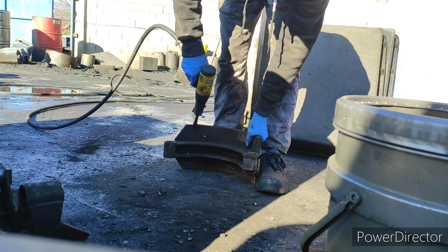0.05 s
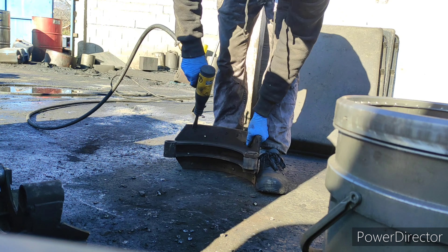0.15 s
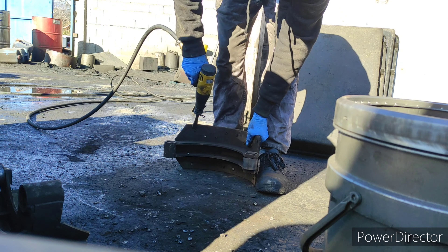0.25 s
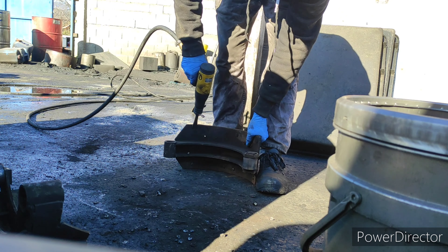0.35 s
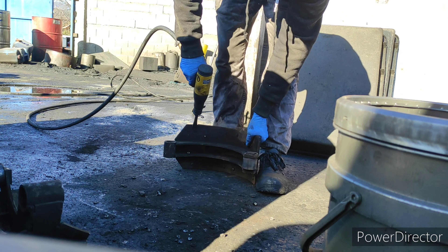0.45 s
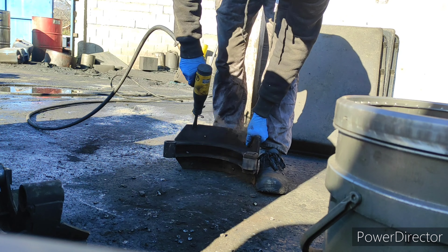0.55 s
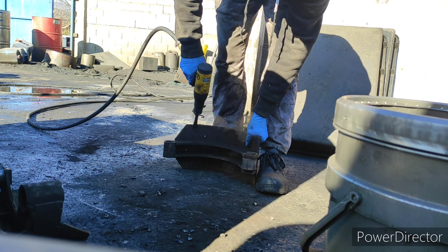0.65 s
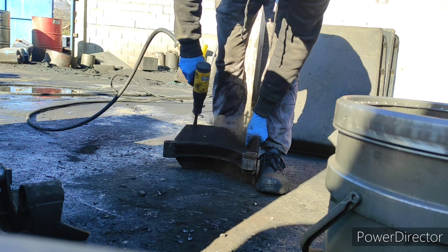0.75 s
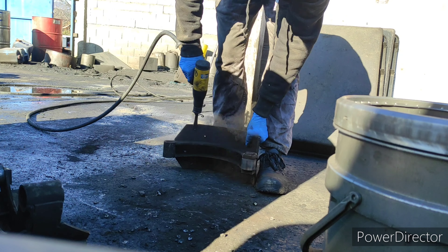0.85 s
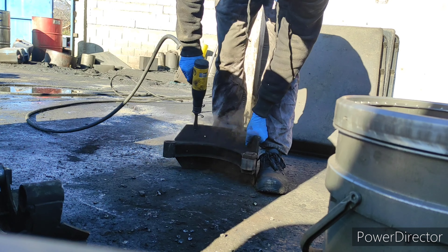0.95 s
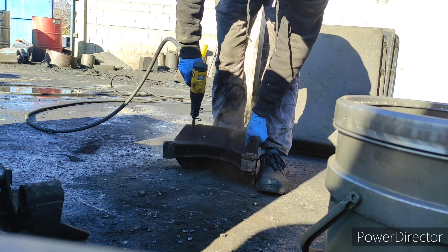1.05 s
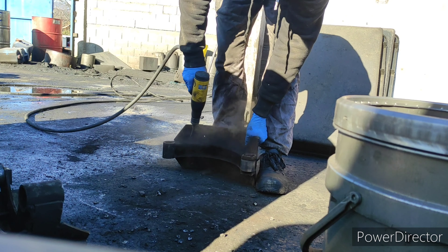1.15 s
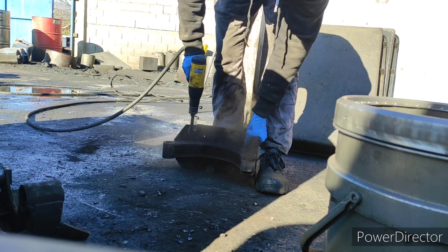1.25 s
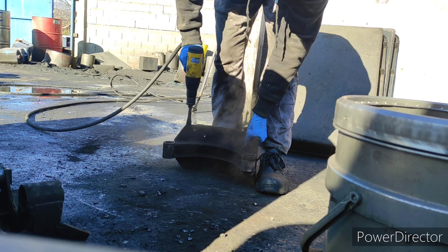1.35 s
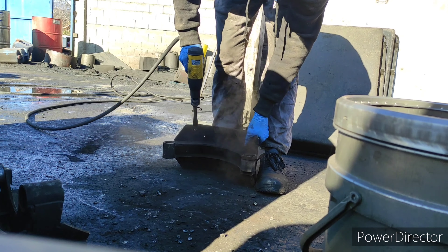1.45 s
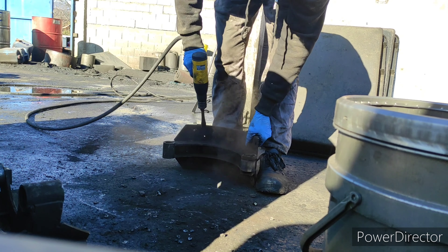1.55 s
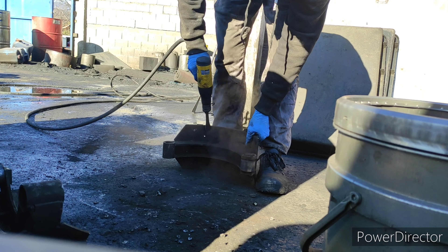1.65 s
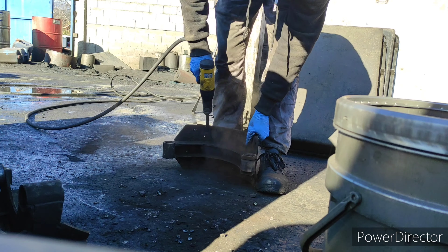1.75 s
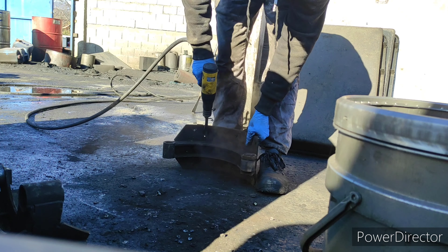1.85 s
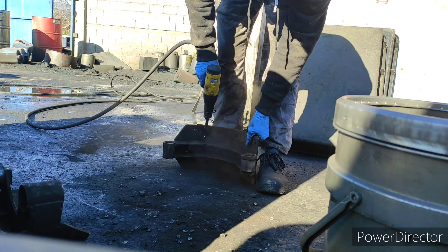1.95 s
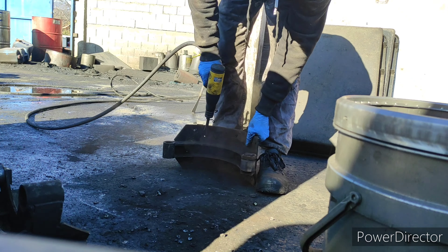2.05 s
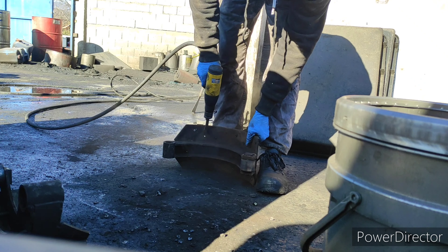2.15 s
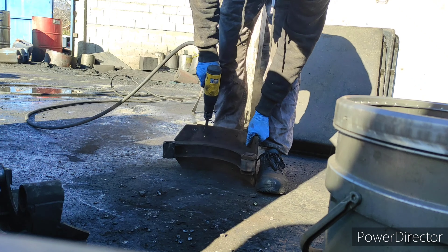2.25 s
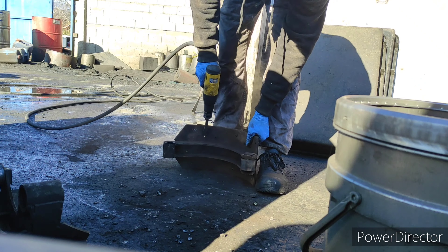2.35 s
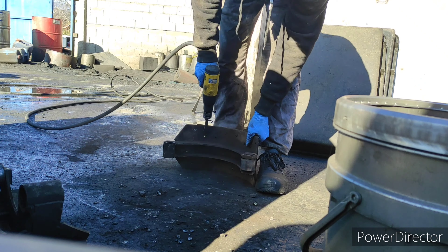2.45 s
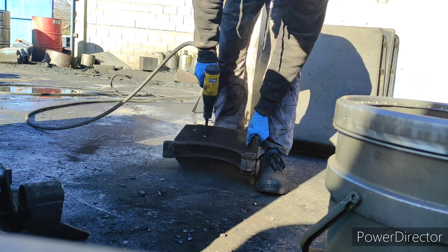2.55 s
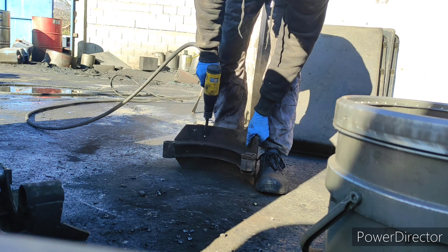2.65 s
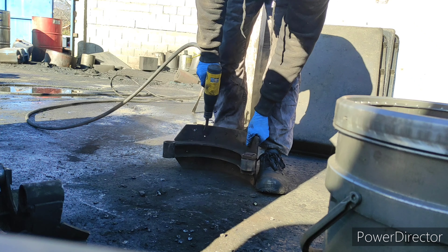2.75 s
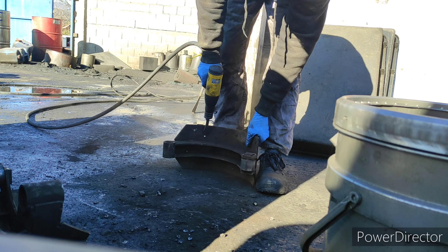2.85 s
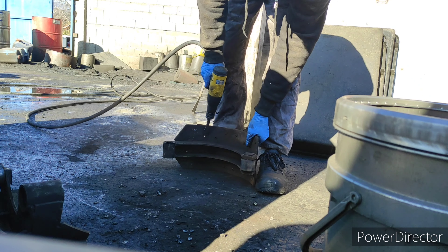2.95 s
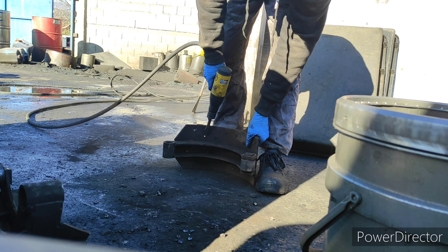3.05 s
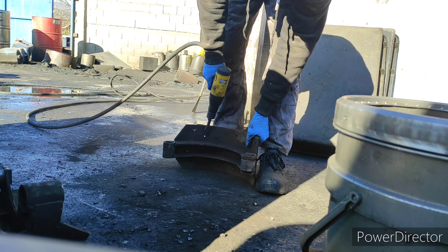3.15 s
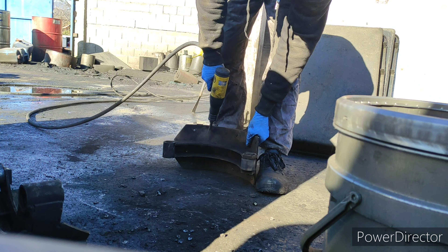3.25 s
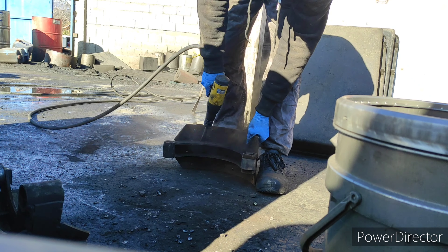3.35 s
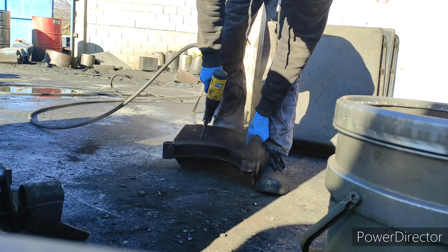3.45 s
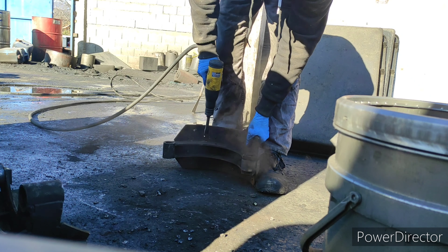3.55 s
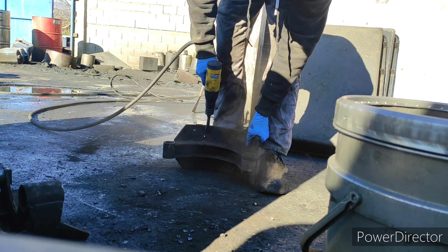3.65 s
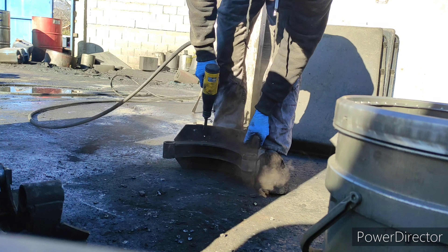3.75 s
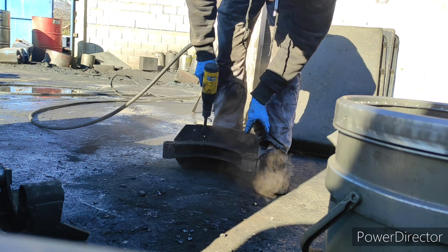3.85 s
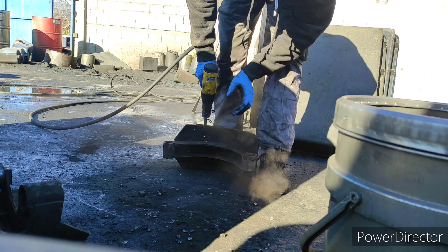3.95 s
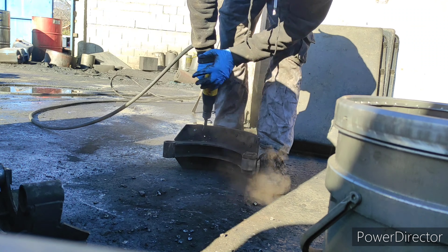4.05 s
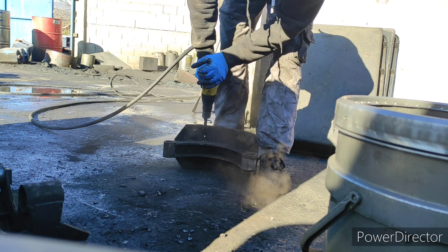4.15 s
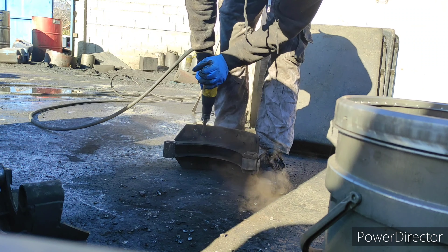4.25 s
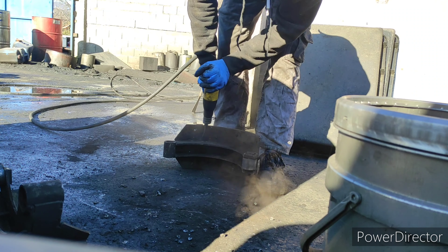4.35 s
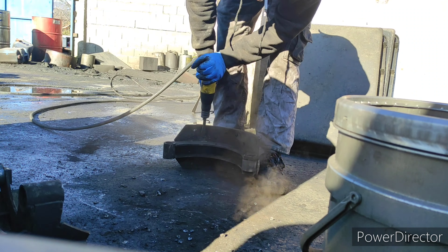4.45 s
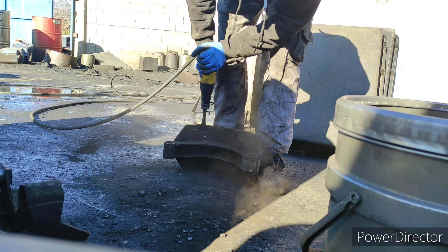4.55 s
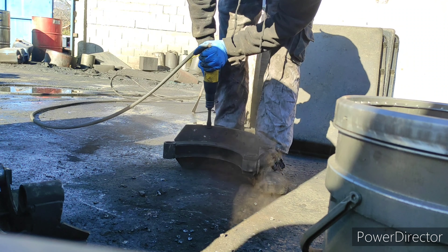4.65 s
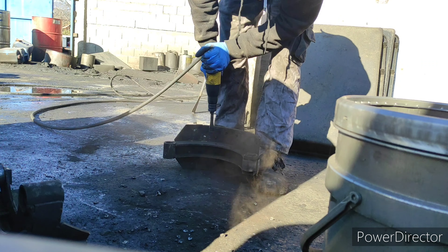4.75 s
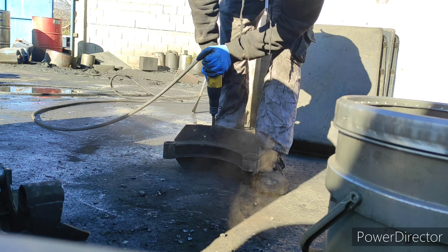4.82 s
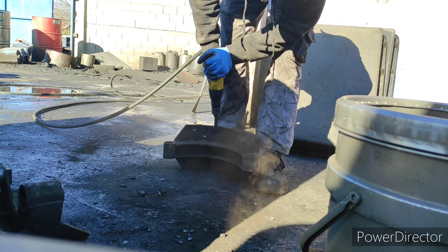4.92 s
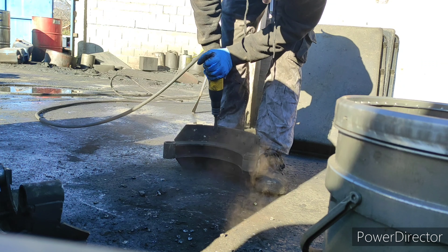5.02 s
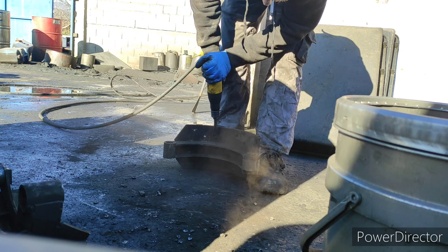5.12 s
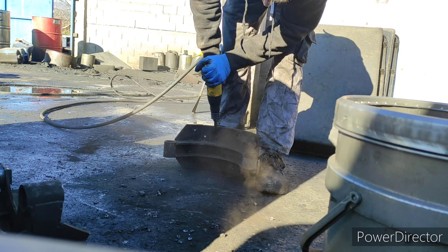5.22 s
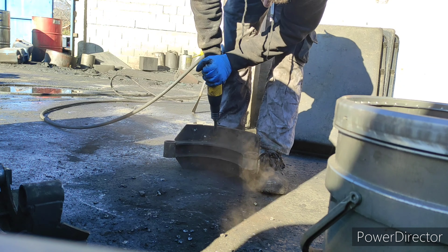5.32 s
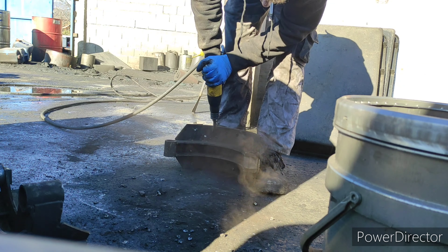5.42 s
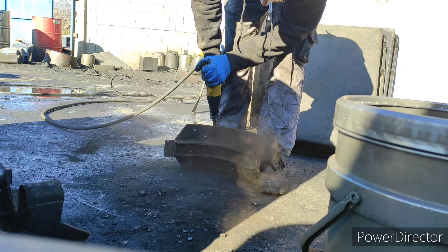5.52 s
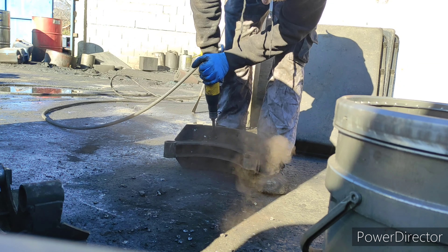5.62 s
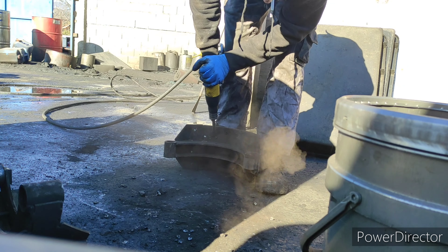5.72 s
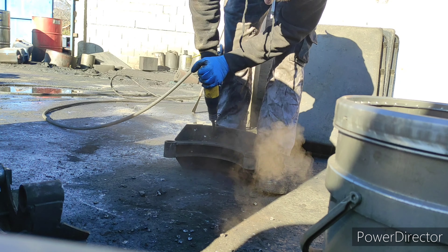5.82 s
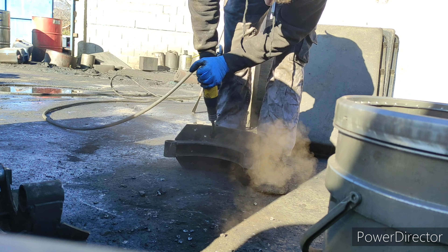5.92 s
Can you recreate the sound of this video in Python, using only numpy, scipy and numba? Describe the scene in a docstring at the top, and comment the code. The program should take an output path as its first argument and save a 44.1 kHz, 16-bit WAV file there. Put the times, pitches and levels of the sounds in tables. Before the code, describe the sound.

An air hammer pounds a heavy steel part in four bursts, the first nearly a second long, the next two very brief, the last over half a second. Each is a dense metallic rattle with puffing exhaust and bright hiss. Between them come steel snaps, small ticks and thuds, and leaking air. Near stereo microphone in a walled yard, thin echo, faint engine drone, background ducked after loud blows.

```python
"""An air chisel hammers the lining off a steel brake shoe in four bursts, in a walled yard.
Each piston stroke vents a puff of exhaust (pressure wavelets), clangs the shoe (filtered noise and decaying
modes) and rattles the chisel under a hiss of air; between bursts, noise knocks and ringing modes make contacts.
An engine idles far off as a few wavering sines, walls add a noise tail, and a peak limiter ducks the loudest
blows and recovers slowly."""
import sys
import numpy as np
from scipy import signal
from scipy.fft import rfft, irfft
from scipy.io import wavfile
from scipy.ndimage import uniform_filter1d, minimum_filter1d
from numba import njit

SR = 44100
rng = np.random.default_rng(int(sys.argv[2]) if len(sys.argv) > 2 else 0)


def output_pcm(signal):
    """Save a mono or channel-first signal as 16-bit PCM at the path in sys.argv[1].

    Samples are clipped to [-1, 1] before scaling.
    """
    pcm = np.clip(np.atleast_2d(signal).T, -1, 1) * 32767
    wavfile.write(sys.argv[1], SR, np.round(pcm).astype(np.int16))


N = 263718

# Levels in the tables are relative: the functions add trims or normalise.
# Piston speed, one curve per trigger pull. Each row: time in seconds, strokes per second.
STROKE_RATE = [
    [(.4372, 42.5), (.4778, 34.8), (.5978, 41.3), (.7978, 44.9), (1.1178, 46.7), (1.1778, 43.6),
     (1.2378, 36), (1.2598, 56.2), (1.2956, 39.2)],
    [(3.3294, 53.3), (3.4078, 42), (3.4878, 52.2), (3.5647, 45.2)],
    [(4.3111, 52), (4.3428, 46.1), (4.4278, 44.8), (4.5128, 57.2), (4.5723, 23.5)],
    [(5.4232, 37.7), (5.4578, 49.8), (5.6478, 49.9), (5.7378, 31.1), (5.8628, 29.1), (5.8978, 38.2),
     (5.98, 38.2)],
]
# Trigger pulls. Each row: valve opens in seconds, chisel bites in seconds, exhaust puff in dB,
# blow on the shoe in dB, air and rattle in dB, ring of the shoe relative to the blow in dB.
PULLS = [(0.4195, .46, -24.5, -17.5, -19, 3.5), (3.3137, 3.345, -25, -20, -20, -5),
         (4.2919, 4.328, -22.5, -19, -18.5, 1), (5.3864, 5.462, -23, -17.5, -17.5, -1)]
# The loose chisel snaps against steel. Each row: start in seconds, crack in dB, ring of the free chisel in dB.
SNAPS = [(.4455, 5, -8), (1.33, -2.5, -11.5), (1.337, 3, -26.5), (1.8154, -5.5, -48), (1.8353, -2.5, -51),
         (3.566, -14.5, -12), (3.597, -0.5, -32), (3.6055, -5.5, -6), (3.791, 3, -42), (3.8113, 1, -42),
         (3.9603, -12.5, -57), (4.5685, -25.5, -6.5), (4.6128, 1, -14), (4.623, -9, -6), (4.668, -1.5, -4),
         (4.676, -5, -8.5), (4.7401, -11, -29), (5.0724, -6, -43), (5.0789, 1, -42), (5.411, -1.5, -15)]
# Light, dull knocks as tool and shoe are shifted. Each row: start in seconds, tick in dB, thud in dB.
KNOCKS = [(1.782, -37.5, -46), (2.0457, -25.5, -37.5), (2.204, -41, -50), (2.224, -30.5, -28.5),
          (2.233, -32, -32), (2.424, -60, -42), (2.9914, -40.5, -57), (3.028, -46, -55), (3.0666, -41, -51),
          (3.112, -45, -62), (3.922, -41, -37), (4.052, -40, -32.5), (4.124, -29, -27), (4.133, -31, -42),
          (4.2, -43.5, -56), (5.276, -32, -56), (5.3266, -40, -29.5)]
# Blows as the pressure comes off. Each row: start in seconds, low modes in dB, high modes in dB.
EASED_BLOWS = [(1.2575, -32, -12), (1.2802, -30, -11), (1.288, -8, -30), (1.33066, -13.5, -15),
               (3.5638, -22, -30), (3.5999, -26, -34), (4.522, -24, -12), (4.548, -18, -28)]
# Last slow strokes, hollow in the barrel. Each row: start in seconds, level in dB.
IDLE_STROKES = [(4.609, -18), (4.662, -16), (4.7229, -18)]
# Air leaks at the trigger valve. Each row: start in seconds, shut in seconds, level in dB.
LEAKS = [(1.213, 1.25, -14.5), (3.546, 3.606, -33), (4.595, 4.69, -37), (4.69, 5.293, -47),
         (4.852, 4.926, -48.5)]

# Modes of the shoe pressed down by the chisel. Each row: frequency in Hz, level in dB, t60 in seconds.
SHOE_HELD = [(970, -4.5, .07), (1218, -3.5, .27), (1280, -4, .1), (1299, -1, .14), (1647, -10, .07),
             (1759, 0.5, .125), (1782, -3, .08), (1846, -3, .07), (1972, -3, .08), (2015, -4, .07),
             (2248, -6, .07), (2347, -8, .07), (2523, -9, .06), (2815, -10, .07), (3235, -5, .06),
             (3713, -17, .1), (4040, -13, .12), (5160, -18, .1), (5545, -17, .1)]
# Modes of the shoe once the pressure is off. Each row: frequency in Hz, level in dB, t60 in seconds.
SHOE_FREE = [(328, -24, .3), (484, -28, .5), (743, -28, .4), (1219, 0, .19), (1220, -16, .52),
             (1290, -15, .22), (1762, 0, .12), (1795, -5, .09), (1975, -12, .07), (2815, -19, .15)]
# Modes of the free chisel. Each row: frequency in Hz, level in dB, t60 in seconds.
CHISEL = [(7364, -17, .15), (7585, 0, .15), (7640, -11, .08), (7709, -10, .12), (8520, -13, .06),
          (9448, -18, .22), (11280, -28, .26), (13540, -23, .22), (13600, -28, .14)]
# Modes of the tool's barrel. Each row: frequency in Hz, level in dB, t60 in seconds.
BARREL = [(221, -5, .08), (450, -4, .05), (570, -4, .05), (690, -3, .07), (735, -3, .09), (800, -4, .07),
          (1020, -7, .06), (1300, -7, .08), (1650, -11, .04)]
# Boom of shoe, ground and barrel at a stroke. Each row: frequency in Hz, level in dB, t60 in seconds.
BOOM = [(165, -13, .06), (200, -6, .06), (226, 3, .08), (295, -1.5, .06), (400, -8, .06), (506, -9, .07),
        (610, -9, .05), (740, -2, .08), (850, -5, .08), (982, -7, .09)]
# Brief clack of steel on steel. Each row: frequency in Hz, level in dB, t60 in seconds.
CLACK = [(1830, -3, .06), (1915, -5, .05), (2010, -4, .07), (2230, -7, .05), (2480, -9, .04),
         (3800, -8, .04), (6350, 0, .06), (6950, -2, .05), (8350, 0, .05)]
# Tones of the far engine. Each row: frequency in Hz, rms level in dB.
IDLE = [(48.4, -49.5), (77.7, -46), (114, -72.5), (143, -60.5), (157, -47), (171.6, -53.5), (200, -60),
        (230, -75.5)]

# Noise spectrum of exhaust reflections and thuds. Each row: frequency in Hz, density in dB per Hz.
PUFF_TAIL = [(110, -38), (170, -28), (220, 8), (380, 1.5), (600, -9.5), (900, -20), (1300, -48.5)]
# Noise spectrum of the shoe's dense modes. Each row: frequency in Hz, density in dB per Hz.
CLANG = [(150, -12), (400, 4), (650, 3.5), (900, 0.5), (1300, -2), (1520, -3.5), (1900, -1), (2500, -4),
         (3250, -2), (3550, -24), (5000, -14.5), (7000, -64)]
# Noise spectrum of air and chisel rattle. Each row: frequency in Hz, density in dB per Hz.
AIR = [(200, -21), (1500, -14.5), (3500, -14), (5000, -16), (6200, -10.5), (7000, -5), (7600, -2.5),
       (8600, -3.5), (9400, -10), (10200, -20), (13000, -19.5), (15300, -22.5)]
# Noise spectrum of a steel snap. Each row: frequency in Hz, density in dB per Hz.
SNAP = [(300, -12.5), (1000, -46), (1500, -11.5), (1820, -3.5), (2600, -13), (3800, -8), (5200, -13),
        (6300, -1.5), (8400, 5.5), (9600, -13), (11500, -24), (15000, -45)]
# Noise spectrum of a light tick. Each row: frequency in Hz, density in dB per Hz.
KNOCK = [(600, -0.5), (1300, 4.5), (2200, 1), (3500, -7), (5000, -10.5), (7200, 0.5), (9000, -8),
         (10200, -54), (15000, -36.5)]
# Noise spectrum of the leaking valve. Each row: frequency in Hz, density in dB per Hz.
LEAK_HISS = [(1200, -14.5), (3500, -15), (5500, -13), (7100, -0.5), (8600, -3.5), (9500, -19.5),
             (10300, -25), (15000, -43)]
# Noise spectrum of the distant outdoors. Each row: frequency in Hz, density in dB per Hz.
YARD = [(20, -8), (50, 3.5), (90, -2.5), (125, -9.5), (180, -0.5), (250, -15.5), (500, -14), (1000, -20),
        (1300, -23), (2000, -27.5), (4000, -38.5), (7200, -33), (9000, -36), (10300, -56), (15000, -58.5)]
# Noise spectrum of the jet's buffeting. Each row: frequency in Hz, density in dB per Hz.
DRAUGHT = [(3, 7), (10, -11.5), (20, -1.5), (40, -11.5), (90, -17.5), (160, -20.5), (400, -67.0)]
# Noise spectrum of the wall echo. Each row: frequency in Hz, density in dB per Hz.
ECHO = [(100, 16.0), (500, 10.0), (1250, 9.5), (1750, -1.5), (4000, 2.0), (8000, -1.0), (12000, 4.5)]
# Noise spectrum of the piston's hollow thud. Each row: frequency in Hz, density in dB per Hz.
HOLLOW_THUD = [(120, -12), (220, 4), (750, 0), (1400, -4), (2500, -28)]

# Resonances of the two microphone ports. Each row: frequency in Hz, left minus right in dB.
PORTS = [(60, 4.5), (250, 4.5), (600, 1), (1300, 2), (2400, 0.5), (5500, -2), (6300, 0), (7200, -12),
         (7900, 6), (8500, 1.5), (9300, 4), (10200, 0.5)]
# Likeness of left and right in all noise. Each row: frequency in Hz, correlation.
LIKENESS = [(50, 0.7), (280, 0.95), (640, 0.21), (1400, 0), (3000, 0.028), (7000, 0.25), (15000, 0)]

USUAL_RATE = 45  # strokes per second at which the pace is zero octaves
AIR_DB_PER_OCTAVE = 1.5  # air and rattle grow with piston speed


def undb(db):
    """Level to amplitude ratio: 20 dB is a factor of ten."""
    return 10 ** (np.asarray(db) / 20)


def clock():
    """Sampling: the time in seconds of every sample."""
    return np.arange(N) / SR


def on_bins(points):
    """Logarithmic frequency interpolation of a table at every Fourier bin."""
    hz, value = np.transpose(points)
    bin_hz = np.maximum(np.arange(N // 2 + 1) * SR / N, 1)
    return np.interp(np.log(bin_hz), np.log(hz), value)


def noise(spectrum):
    """Spectral shaping: stereo noise of rms 1; mid and side weights set the channel correlation."""
    mid, side = rfft(rng.standard_normal((2, N)))
    alike = np.clip(on_bins(LIKENESS), -1, 1)
    mid = mid * np.sqrt(1 + alike)
    side = side * np.sqrt(1 - alike)
    x = irfft(np.array([mid + side, mid - side]) * undb(on_bins(spectrum)), N)
    return x / x.std()


def walk(rate):
    """Low-pass random fluctuation: twice-smoothed random steps with a standard deviation of 1."""
    k = int(SR / rate)
    steps = np.repeat(rng.standard_normal(N // k + 1), k)
    x = uniform_filter1d(uniform_filter1d(steps, k), k)[:N]
    return x / x.std()


def fade(t60):
    """Exponential decay: amplitude falls by 60 dB in t60 seconds."""
    return np.exp(-np.log(1000) * clock() / t60)


def gate(start, end, attack_s, release_t60_s):
    """Valve envelope: linear rise, hold until the end, exponential release."""
    t = clock()
    rise = np.clip((t - start) / attack_s, 0, 1)
    return rise * np.exp(-np.log(1000) * np.maximum(t - end, 0) / release_t60_s)


def unit(x):
    """Energy normalisation: a response of energy 1, averaged over the channels."""
    return x / np.sqrt(np.mean(np.sum(x ** 2, axis=-1)))


def scatter(size, spread_db=.8):
    """Random variation: no two strokes are quite alike in level."""
    return size * undb(spread_db * rng.standard_normal(len(size)))


def strike(times, sizes, response):
    """Convolution: each impulse starts the first second of the same response."""
    pulses = np.zeros(N)
    samples = np.clip((np.asarray(times) * SR).astype(int), 0, N - 1)
    np.add.at(pulses, samples, sizes)
    return signal.fftconvolve(pulses[None], np.atleast_2d(response)[:, :SR], axes=1)[:, :N]


def crash(times, sizes, spectrum, shape):
    """High modal density: countless close modes act as noise whose blow energies add."""
    envelope = np.sqrt(np.abs(strike(times, np.square(sizes), shape ** 2)))
    softened = uniform_filter1d(uniform_filter1d(envelope, size=15), size=15)
    return noise(spectrum) * softened


def ring(modes, spread=.55, contact_s=.0002):
    """Modal superposition: decaying sines after a soft contact, with a separate phase at each port."""
    t = np.arange(SR) / SR
    total = 0
    for hz, db, t60 in modes:
        phase = spread * rng.standard_normal((2, 1))
        total = total + undb(db) * np.exp(-np.log(1000) * t / t60) * np.sin(2 * np.pi * hz * t + phase)
    push = 1 - np.exp(-(t / contact_s) ** 2)
    return push * total


def background(noise_db=-45.5, engine_db=-1, waver_db=1.5, drift_rad=0.27):
    """Distant sources: slowly swelling outdoor noise and wavering engine tones, a little to the left."""
    engine = 0
    for hz, db in IDLE:
        level = np.sqrt(2) * undb(db + waver_db * walk(7.4))  # sqrt(2) turns rms into peak
        phase = drift_rad * walk(1.1) + rng.uniform(0, 2 * np.pi)
        engine = engine + level * np.sin(2 * np.pi * hz * clock() + phase)
    pan_db = np.array([[1.3], [-1.3]])
    swell_db = .6 * walk(1.5)
    return undb(engine_db + pan_db) * engine + noise(YARD) * undb(noise_db + swell_db)


def yard_echo(x, db=-19, t60_s=0.73, gap_s=.012):
    """Diffuse reflection: walls and scrap return a thin decaying tail, weaker above the low range."""
    tail = noise(ECHO) * fade(t60_s) * (clock() > gap_s)
    return undb(db) * signal.fftconvolve(x, unit(tail[:, :SR]), axes=1)[:, :N]


def draught(flow, db=-1, delay_s=0.0071):
    """Turbulent pressure: the exhaust jet reaches the microphone a little later and buffets it."""
    late_flow = np.interp(clock() - delay_s, clock(), flow)
    return undb(db) * noise(DRAUGHT) * late_flow


def leak(flutter_db=1.5, attack_s=0.0034, release_t60_s=0.43):
    """Turbulent flow through a narrow gap: a thin hiss while the trigger is nearly shut."""
    opening = sum(undb(db) * gate(start, end, attack_s, release_t60_s) for start, end, db in LEAKS)
    return noise(LEAK_HISS) * opening * undb(flutter_db * walk(39))


def run_down(thud_db=-13):
    """Cavity resonance: with the trigger nearly shut the piston falls back with dull, hollow thuds."""
    s, stroke_db = np.transpose(IDLE_STROKES)
    thud = crash(s, undb(stroke_db + thud_db), HOLLOW_THUD, fade(.16))
    return strike(s, undb(stroke_db), ring(BARREL, contact_s=0.00058)) + thud


def knocks(tick_db=-1, thud_db=-4):
    """Light impact: a tick of steel and a thud of the shoe on the ground, both short noise."""
    s, db, thud = np.transpose(KNOCKS)
    tick_decay = fade(.016) + .25 * fade(.1)
    ticks = crash(s, undb(db + tick_db), KNOCK, tick_decay)
    return ticks + crash(s, undb(thud + thud_db), PUFF_TAIL, fade(.09))


def snaps(crack_db=-4, chisel_db=-3, clack_db=-24, crack_t60_s=0.0064, rattle_db=-18, rattle_t60_s=0.1):
    """Hard impact, also as each pull throws the chisel forward: crack, clack, rattle and free ringing."""
    throw_db, throw_ring_db = -10, -15
    throws = [(pull[0], throw_db, throw_ring_db) for pull in PULLS]
    s, db, free_chisel = np.transpose(list(SNAPS) + throws)
    decay = fade(crack_t60_s) + undb(rattle_db) * fade(rattle_t60_s)
    crack = crash(s, undb(db + crack_db), SNAP, decay)
    clack = strike(s, undb(db + clack_db), ring(CLACK))
    return crack + clack + strike(s, undb(free_chisel + chisel_db), ring(CHISEL))


def inrush(db=-13.5, t60_s=0.12):
    """Sudden expansion: a spit of air just before the first stroke of each pull."""
    opens = [pull[0] for pull in PULLS]
    return crash(opens, np.full(len(opens), undb(db)), AIR, fade(t60_s))


def eased_shoe():
    """Reduced damping: as pressure comes off, blows ring low or high modes according to where they land."""
    s, low_db, high_db = np.transpose(EASED_BLOWS)
    split_hz, phase_spread = 1500, .26
    low = ring([mode for mode in SHOE_FREE if mode[0] < split_hz], phase_spread)
    high = ring([mode for mode in SHOE_FREE if mode[0] >= split_hz], phase_spread)
    return strike(s, undb(low_db), low) + strike(s, undb(high_db), high)


def octaves(speed, t):
    """Logarithmic pace: octaves of piston speed above the usual rate at the times t."""
    return np.log2(np.interp(t, *np.transpose(speed)) / USUAL_RATE)


def airflow(attack_s=0.044, release_t60_s=0.26):
    """Flow control: air comes on with the trigger, follows the piston and dies after the last stroke."""
    flow = 0
    for speed, (opens, _, _, _, air_db, _) in zip(STROKE_RATE, PULLS):
        level = undb(air_db + AIR_DB_PER_OCTAVE * octaves(speed, clock()))
        flow = flow + level * gate(opens, speed[-1][0], attack_s, release_t60_s)
    return flow


def chatter(flow, db=2, spread_db=3, t60_s=0.016, per_s=220):
    """Random impacts: the chisel's shank clatters in its holder while the air flows."""
    count = int(per_s * N / SR)
    s = rng.uniform(0, N / SR, count)
    sizes = undb(spread_db * np.minimum(rng.exponential(size=count), 3))
    return undb(db) * flow * crash(s, sizes, AIR, fade(t60_s))


def air(times, size, flow, rattle_db=30, steel_db=17.0, flutter_db=2):
    """Damped impact and jet noise: the loaded chisel jangles on stroke and return over spurts and hiss."""
    lag_s, return_s, return_jitter_s = .001, .0088, .0006
    return_db, spurt_db, hiss_db = -1.5, -27, -3.5
    returns = times + return_s + return_jitter_s * rng.standard_normal(len(times))
    hits = np.r_[times + lag_s, returns]
    size = scatter(np.r_[size, size * undb(return_db)], spread_db=1.5)
    decay = (fade(.025) + .8 * fade(.13)) * (1 - np.exp(-clock() / .0004))
    jangle = strike(hits, size, unit((noise(AIR) * decay)[:, :SR]))
    spurts = undb(spurt_db) * crash(hits, size, AIR, decay)
    steel = strike(hits, size, unit(ring(CHISEL) * fade(.12)[:SR]))  # the load shortens the ring
    hiss = noise(AIR) * flow * undb(hiss_db + flutter_db * walk(110))
    return undb(rattle_db) * (jangle + spurts) + undb(steel_db) * steel + hiss


def puff_wave(cycles, width_cycles=.33):
    """Volume displacement: a push-pull pressure wave under a Gaussian window."""
    return -np.sin(2 * np.pi * cycles) * np.exp(-(cycles / width_cycles) ** 2 / 2)


def exhaust(times, size, pace, low_cut_hz=120):
    """Pulsed flow: strokes vent a wave and a weaker, sharper, opposite return, with boom and reflections."""
    vent_s, return_s, peak_db, return_db, boom_db = .0022, .0068, 19, -8, 30.5
    tail_db, tail_t60_s, turbulence_db = 20, .08, -2
    size = scatter(size)
    t, vents = clock(), np.zeros(N)
    starts = times + vent_s
    pitches_hz = 335 * 2 ** (.6 * pace)  # a faster piston gives shorter, higher puffs
    for start, strength, hz in zip(starts, size * undb(peak_db), pitches_hz):
        near = np.abs(t - start) < 2 * return_s
        age = t[near] - start
        back = undb(return_db) * puff_wave(np.sqrt(2) * hz * (age - return_s))
        vents[near] += strength * (puff_wave(hz * age) - back)
    tail_decay = fade(tail_t60_s)
    reflections = undb(tail_db) * unit((noise(PUFF_TAIL) * tail_decay)[:, :SR])
    around = reflections - undb(boom_db) * unit(ring(BOOM))
    turbulence = undb(turbulence_db) * crash(starts, size, PUFF_TAIL, tail_decay)
    puffs = vents + strike(starts, size, around) + turbulence
    return signal.sosfilt(signal.butter(2, low_cut_hz, "high", fs=SR, output="sos"), puffs)


def shoe(times, size, ringing, modes_db=32, clang_db=30):
    """Impact with one rebound: a repeated short clang, the shoe's modes and a little grinding of the lining."""
    travel_s, seat_jitter_s, bounce_s, bounce_db, grind_db = .0045, .00006, .0083, -4, -25
    blows = times + travel_s + seat_jitter_s * rng.standard_normal(len(times))
    size = scatter(size, spread_db=1.4)
    bounces = blows + bounce_s * rng.uniform(.85, 1.15, len(blows))
    hits = np.r_[blows, bounces]
    sizes = undb(clang_db) * np.r_[size, size * undb(bounce_db)]
    decay = fade(.022) + .5 * fade(.13)
    clang = strike(hits, sizes, unit((noise(CLANG) * decay)[:, :SR]))
    response = unit(ring(SHOE_HELD, contact_s=0.00056))
    modes = undb(modes_db) * strike(blows, scatter(size * ringing), response)
    return clang + modes + undb(grind_db) * crash(hits, sizes, CLANG, decay)


def strokes(speed, jitter_s=.00004):
    """Phase accumulation: the piston completes a cycle at each whole number of the integrated rate."""
    t = np.arange(speed[0][0], speed[-1][0], 1 / SR)
    cycles = np.cumsum(np.interp(t, *np.transpose(speed))) / SR
    times = np.interp(np.arange(int(cycles[-1]) + 1), cycles, t)
    return times + jitter_s * rng.standard_normal(len(times))


def hammering(blow_db_per_octave=7, unseated_db=-10.5):
    """Periodic excitation: time, pace, puff, blow, rattle and shoe ring of every stroke."""
    columns = []
    for speed, (opens, bites, puff_db, blow_db, air_db, ring_db) in zip(STROKE_RATE, PULLS):
        t = strokes(speed)
        pace = octaves(speed, t)
        puff = np.full(len(t), undb(puff_db))
        # a stroke before the chisel bites barely reaches the shoe
        blow = undb(blow_db + blow_db_per_octave * pace + unseated_db * (t < bites))
        rattle = undb(air_db + AIR_DB_PER_OCTAVE * pace)
        columns.append([t, pace, puff, blow, rattle, np.full(len(t), undb(ring_db))])
    return np.concatenate(columns, axis=1)


def scene():
    """Linear superposition: the tool, its echo, its draught and the yard."""
    times, pace, puff, blow, rattle, ringing = hammering()
    flow = airflow()
    bursts = exhaust(times, puff, pace) + shoe(times, blow, ringing) + air(times, rattle, flow) + chatter(flow)
    work = bursts + eased_shoe() + snaps() + inrush() + knocks() + run_down() + leak()
    return work + yard_echo(work) + draught(flow) + background()


@njit
def hold(peak, release):
    """Peak detection: follow rises at once and let go exponentially."""
    out, e = np.empty(len(peak)), 0.
    for i in range(len(peak)):
        e = max(peak[i], e * (1 - release))
        out[i] = e
    return out


def record(dry, ceiling=0.86, release_s=0.46, top_hz=15550):
    """Reception: port resonances, a look-ahead peak limiter and a steep treble cut."""
    x = irfft(rfft(dry) * undb(np.outer([.5, -.5], on_bins(PORTS))), N)
    peaks = hold(np.abs(x).max(axis=0), 1 / (release_s * SR))
    gain = ceiling / np.maximum(peaks, ceiling)
    gain = uniform_filter1d(minimum_filter1d(gain, size=65), size=65)  # starts ducking ahead of the peak
    return signal.sosfilt(signal.ellip(10, .2, 80, top_hz, fs=SR, output="sos"), x * gain)


dry = scene()
out = record(dry)
output_pcm(out)
```